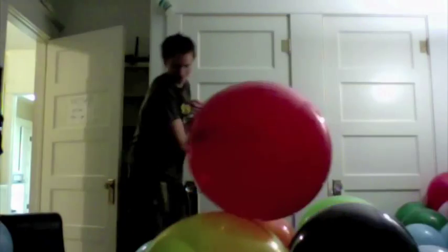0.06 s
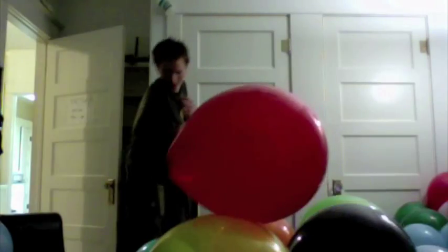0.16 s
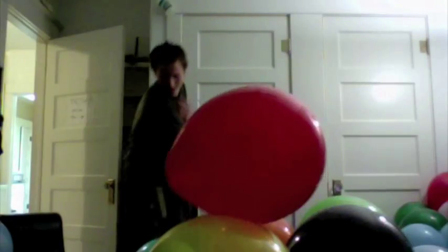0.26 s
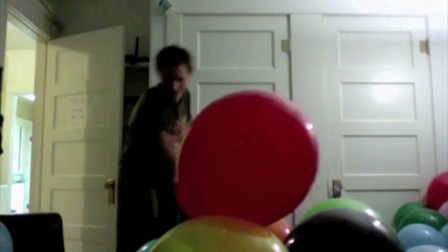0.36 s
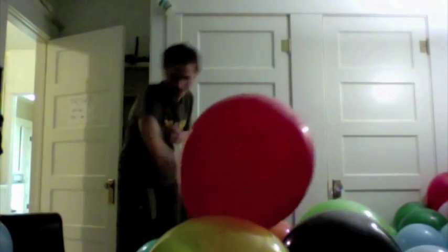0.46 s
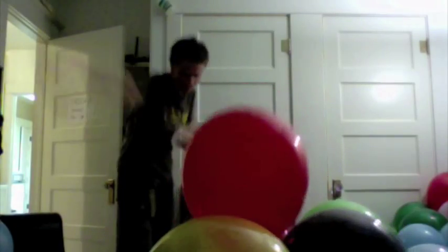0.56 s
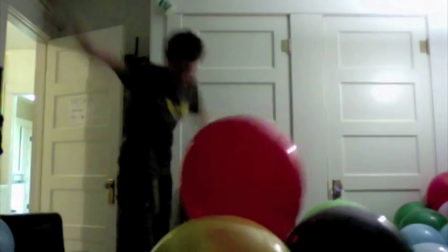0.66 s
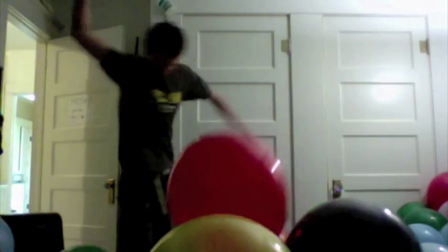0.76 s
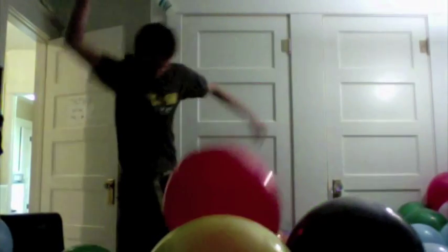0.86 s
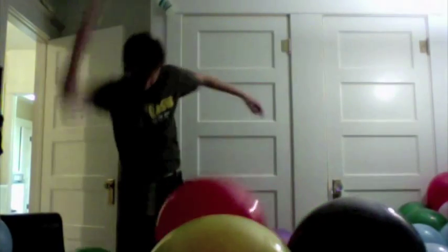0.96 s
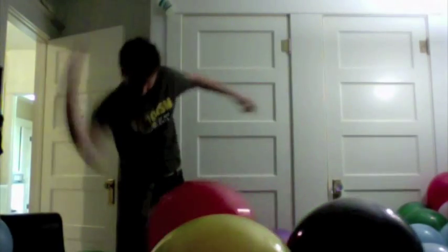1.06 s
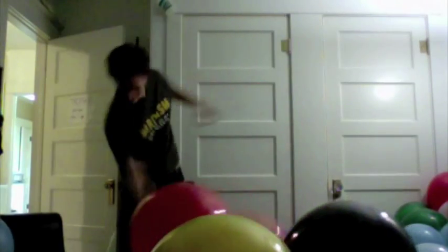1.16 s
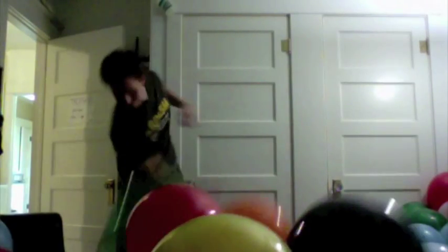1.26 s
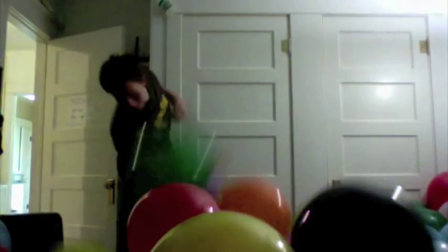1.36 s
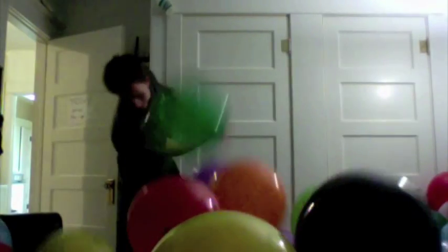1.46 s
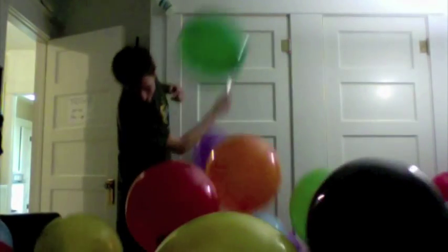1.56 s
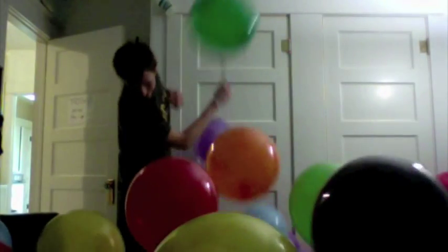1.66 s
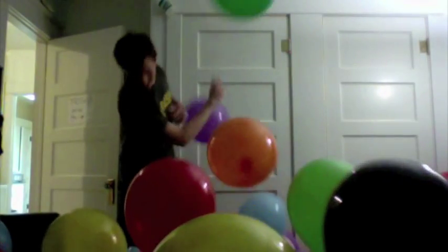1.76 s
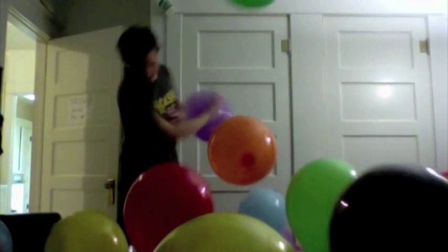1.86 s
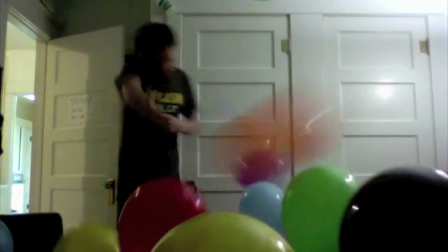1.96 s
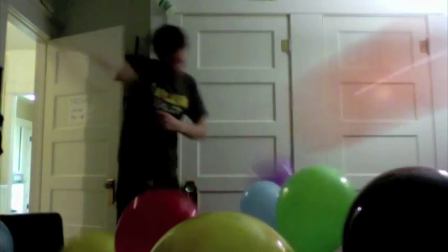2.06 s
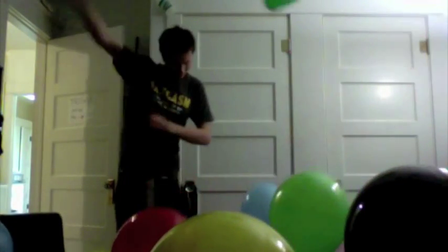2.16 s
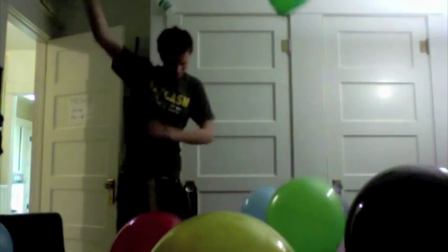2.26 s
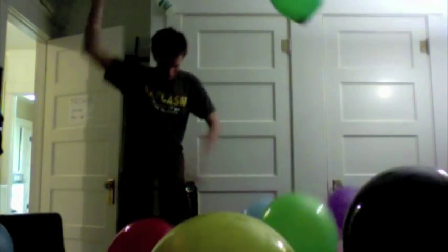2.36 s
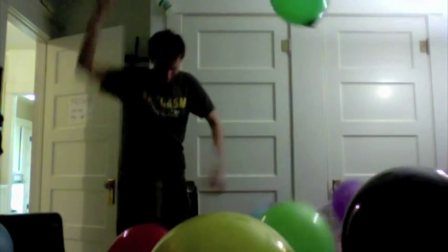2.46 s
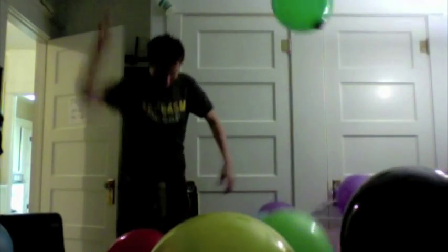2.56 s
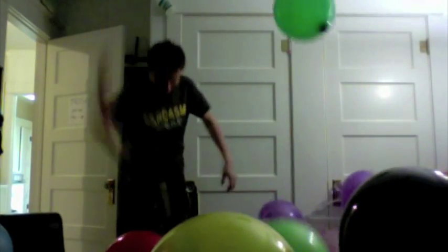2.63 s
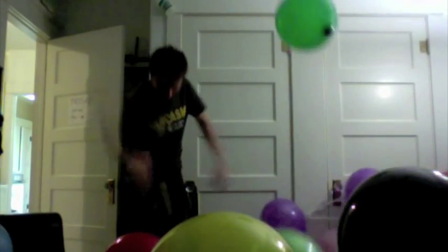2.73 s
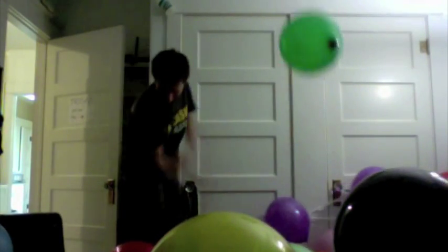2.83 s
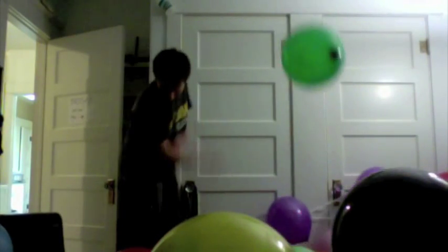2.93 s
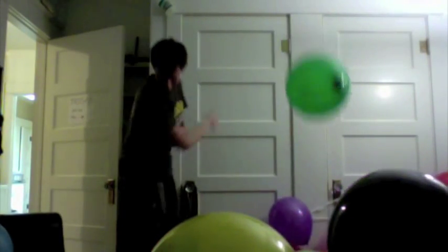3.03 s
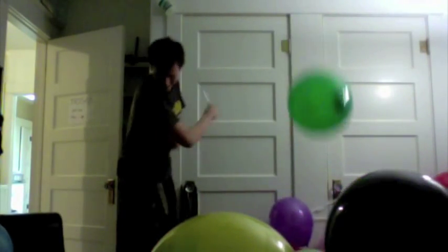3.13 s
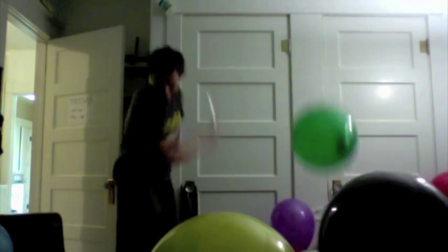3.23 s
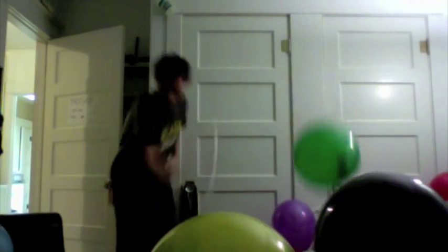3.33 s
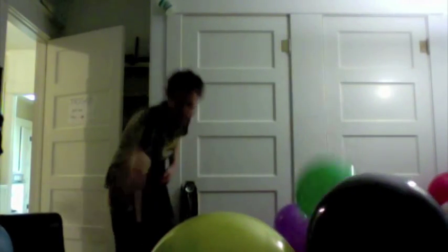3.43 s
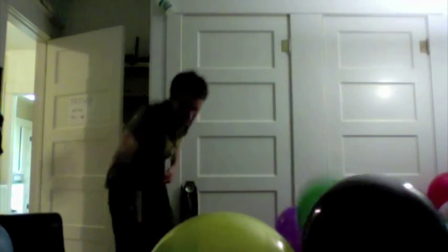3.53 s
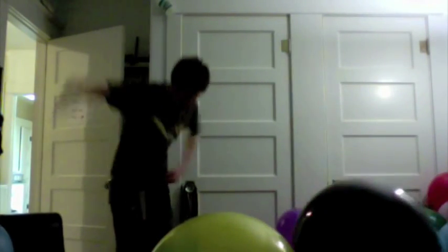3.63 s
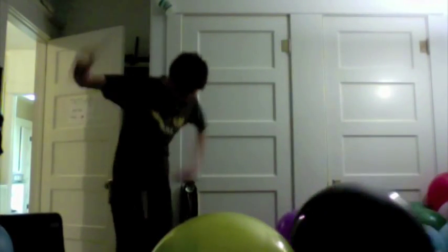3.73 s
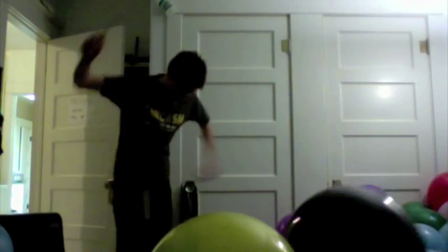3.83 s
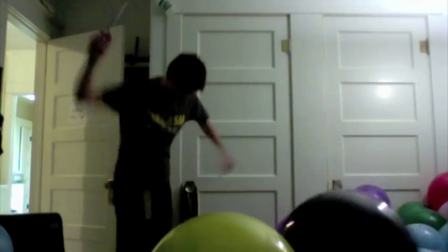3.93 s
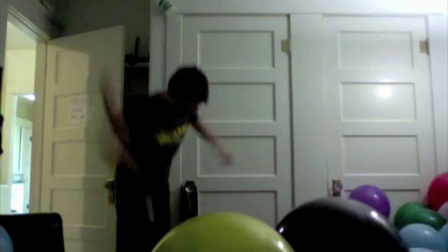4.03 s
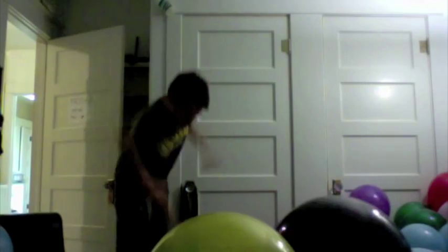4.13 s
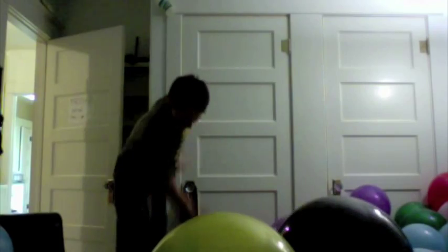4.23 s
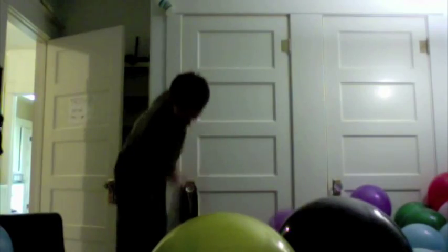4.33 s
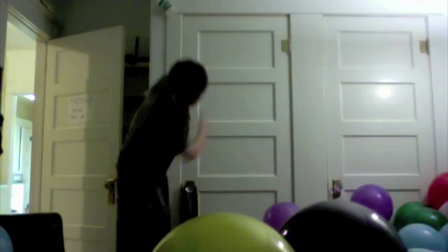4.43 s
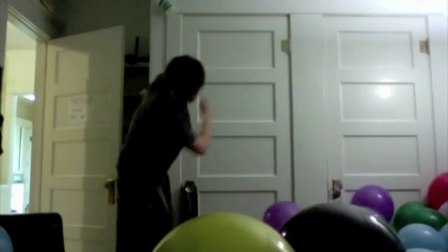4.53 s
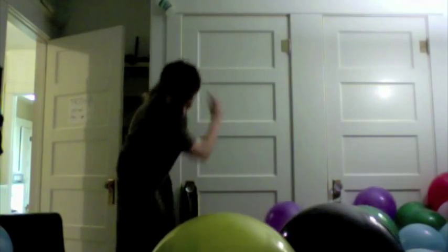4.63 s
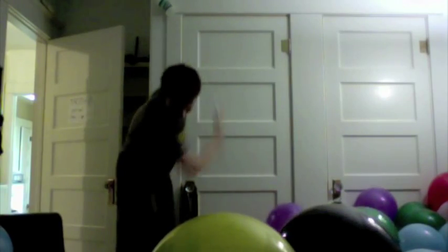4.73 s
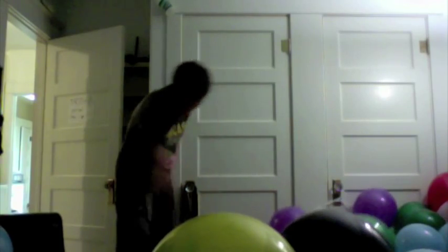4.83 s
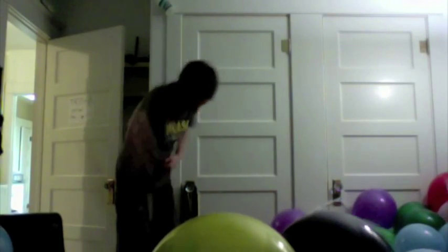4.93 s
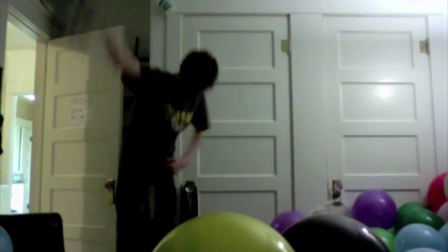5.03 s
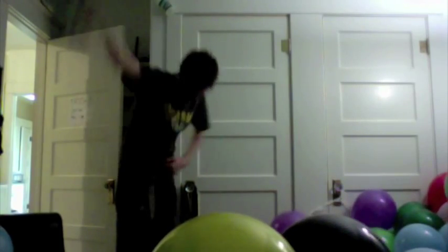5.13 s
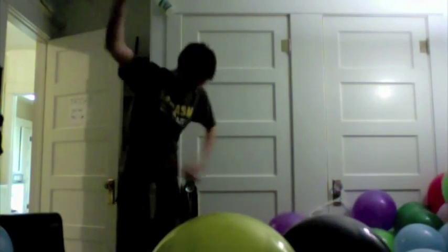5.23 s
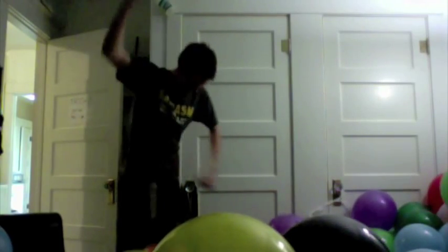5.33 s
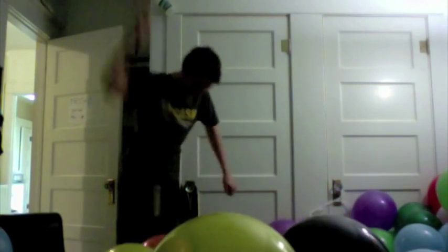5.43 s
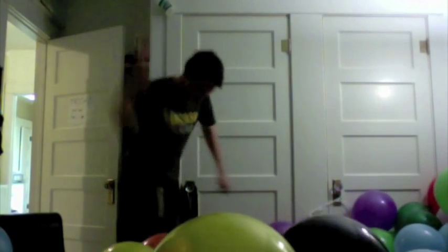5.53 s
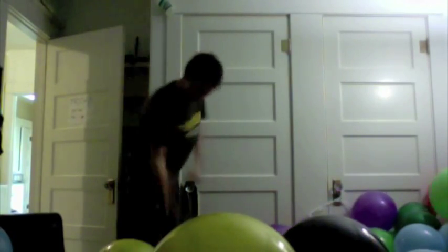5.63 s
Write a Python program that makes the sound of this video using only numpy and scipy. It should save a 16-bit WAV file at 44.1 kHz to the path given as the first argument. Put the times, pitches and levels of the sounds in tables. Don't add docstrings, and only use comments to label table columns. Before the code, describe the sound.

A small, hard-walled room full of latex balloons, heard through a small, thin-sounding microphone that overloads. It opens with faint hiss, a brief dip in level and tiny rubbery bumps. At about 0.5 s a bright, sharp burst cracks and splashes off the walls. Near 1.2 s comes a softer, booming slap with a floor thud, then hollow balloon bumps around 1.6 and 1.85 s, and a sharp but weaker slap at 1.95 s. Rubber squeaks and scuffs lead to a strong, low-bodied blast at 2.75 s. A quick, crisp burst follows at 3.4 s, then busy bumping, scuffing and creaking from 3.6 to 4.1 s. A loud, clipped burst hits at 4.2 s, a brief rubber creak at 4.5 s, a faint dull slap with a low thud at 4.87 s, a short bump at 5.1 s, and the biggest bang at 5.6 s, cut off while still ringing.

```python
import sys
import numpy as np
from scipy import signal
from scipy.io import wavfile
from scipy.ndimage import uniform_filter1d

SR = 44100
rng = np.random.default_rng(int(sys.argv[2]) if len(sys.argv) > 2 else 0)


def waveform_to_disk(signal):
    frames = np.transpose(np.atleast_2d(signal))
    scaled = np.clip(frames, -1, 1) * 32767
    samples = np.round(scaled).astype(np.int16)
    wavfile.write(sys.argv[1], SR, samples)


def voltage_ratio(level):
    return 10 ** (np.asarray(level, float) / 20)


N = 250752


def at_hz(points, hz):
    table = np.array(points)
    return np.interp(np.log(hz), np.log(table[:, 0]), table[:, 1])


def rms_one(x):
    return x / np.sqrt(np.mean(x ** 2) + 1e-20)


def highpass(x, order, cut_hz):
    return signal.sosfilt(signal.butter(order, cut_hz, "high", fs=SR, output="sos"), x)


def resonate(x, hz, width_hz):
    r = np.exp(-np.pi * width_hz / SR)
    zeros = np.array([1, 0, -1]) * (1 - r * r) / 2
    poles = [1, -2 * r * np.cos(2 * np.pi * hz / SR), r * r]
    return signal.lfilter(zeros, poles, x)


def swell(rise_ms, t60_s, size):
    t = np.arange(size) / SR
    return (1 - np.exp(-1000 * t / max(rise_ms, .2))) * voltage_ratio(-60 * t / t60_s)


def flutter(count, per_s, size):
    knots_s = np.arange(int(size / SR * per_s) + 2) / per_s
    t = np.arange(size) / SR
    return np.array([np.interp(t, knots_s, row) for row in rng.standard_normal((count, len(knots_s)))])


def add(out, s, x):
    i = max(round(s * SR), 0)
    out[i:i + len(x)] += x[:N - i]


EDGES_HZ = 44 * 2 ** np.arange(0, 8.7, 1 / 3)


def noise_bands():
    white = rng.standard_normal((2, N))
    bands = []
    for k, edges in enumerate(zip(EDGES_HZ, EDGES_HZ[1:])):
        sos = signal.butter(2, edges, "band", fs=SR, output="sos")
        bands.append(signal.sosfilt(sos, white[k % 2]))
    return np.sqrt(EDGES_HZ[1:] * EDGES_HZ[:-1]), np.array(bands)


# (time [s], level [dB rms])
AIR = [(0, -64), (.15, -65.5), (.3, -70.5), (.9, -67), (1.75, -69), (2.4, -66), (2.599, -64), (3.2, -63.5),
       (3.4, -70.5), (4.05, -60), (4.6, -63), (4.8, -67), (5.15, -60), (5.3, -68), (5.69, -78)]
# (frequency [Hz], level [dB per Hz])
AIR_COLOUR = [(50, -11.5), (90, -5.5), (140, 0), (300, -6.5), (480, -2), (800, -11.5), (1200, -14),
              (3500, -12.5), (7000, -22.5), (11000, -26), (16000, -43.5)]
HISS_DB, HISS_FOLLOWS, AIR_MEAN_DB = -69, 0.43, -63.5


def air(centres_hz, bands, patchy_db):
    stir_db = np.interp(np.arange(N) / SR, *np.transpose(AIR))
    hiss_db = HISS_DB + HISS_FOLLOWS * (stir_db - AIR_MEAN_DB)
    colour = voltage_ratio(at_hz(AIR_COLOUR, centres_hz))[:, None]
    flicker = voltage_ratio(patchy_db * flutter(len(centres_hz), 11, size=N))
    patches = colour * bands[:, ::-1] * flicker
    low = centres_hz < 1100
    shuffle = rms_one(patches[low].sum(axis=0))
    hiss = rms_one(patches[~low].sum(axis=0))
    return voltage_ratio(stir_db) * shuffle + voltage_ratio(hiss_db) * hiss


# (time [s], level [dB rms], centre [Hz], t60 [s])
BUMPS = [(.002, -52, 440, 0.15), (.12, -64, 600, 0.45), (.288, -62.5, 750, 0.32), (.33, -61, 680, .16),
         (1.581, -57, 600, 0.11), (1.6, -49.5, 380, 0.2), (1.83, -50.5, 600, 0.61),
         (1.853, -33.5, 460, 0.13), (1.873, -42, 218, .28), (2.588, -50, 200, .6), (2.67, -47, 250, 0.27),
         (3.192, -63, 300, 0.14), (3.7, -35.5, 680, .24), (3.855, -40, 587, 0.15), (3.97, -46, 197, .3),
         (3.987, -51, 298, .067), (4.045, -45.5, 599, .1), (5.087, -37, 748, 0.076),
         (5.115, -51, 800, 0.077)]
# (time [s], level [dB rms], centre [Hz], t60 [s])
SCUFFS = [(1.099, -49, 646, .1), (1.275, -49.5, 9900, .4), (1.601, -60, 2484, .14),
          (1.682, -61, 5000, .071), (1.865, -46.5, 1800, 0.16), (2.219, -66, 2470, 0.26),
          (2.43, -65.5, 2770, 0.44), (2.638, -43.5, 1770, 0.25), (2.665, -47, 1892, 0.35),
          (3.7, -34.5, 1980, 0.17), (3.771, -46, 1019, 0.084), (3.836, -51, 8000, 0.095),
          (3.775, -52.5, 3800, .08), (3.882, -49.5, 1198, 0.087), (3.884, -56.5, 3010, 0.092),
          (4.02, -58.5, 3200, 0.1), (4.086, -49, 1375, 0.13), (4.095, -58, 3520, .1),
          (4.14, -55, 1492, 0.09), (5.088, -50, 1685, 0.1)]
# (time [s], level [dB rms], centre [Hz], t60 [s])
CREAKS = [(.17, -67, 1900, 0.27), (.13, -63, 600, .4), (.25, -63, 800, .35), (3.03, -55, 1534, 0.61),
          (3.165, -50.5, 1554, 0.13), (3.64, -41, 1652, .25), (3.7, -45.5, 3220, .25),
          (3.748, -50, 3230, 0.24), (3.77, -50.5, 1640, .2), (3.854, -41, 960, 0.099),
          (4.018, -50.5, 1650, 0.17), (4.488, -45.5, 1600, 0.17)]
# (time [s], level [dB rms], centre [Hz])
TICKS = [
    (.11, -68, 9000),
    (0.134, -60.5, 6300),
    (.143, -66, 9500),
    (.288, -67, 8600),
    (1.88, -54, 6400),
    (2.403, -69, 7560),
    (3.703, -45, 6900),
    (4.003, -57, 7220),
    (5.093, -55.5, 8360),
    (5.565, -62, 4280),
]
TICK_T60_S = 0.075
# (width [share of pitch], rise [ms])
BUMP, SCUFF, CREAK, TICK = (1, 4.9), (0.75, 5.4), (0.15, 3.2), (0.33, 2.8)


def stirring(grain_db):
    out, size = np.zeros(N), SR // 2
    ticks = [(*row, TICK_T60_S) for row in TICKS]
    for rows, (share, rise_ms) in [(BUMPS, BUMP), (SCUFFS, SCUFF), (CREAKS, CREAK), (ticks, TICK)]:
        for s, level_db, hz, t60_s in rows:
            grains = rng.standard_normal(size) * voltage_ratio(grain_db * flutter(1, 150, size=size)[0])
            narrow = resonate(grains, hz, 0.31 * share * hz)
            puff = resonate(narrow, hz, 3.4 * share * hz)
            add(out, s, voltage_ratio(level_db) * rms_one(puff) * swell(rise_ms, t60_s, size=size))
    return out


# (time [s], level [dB peak], frequency [Hz], t60 [s])
RINGS = [
    (.185, -48, 540, 0.095),
    (1.095, -35.5, 470, 0.1),
    (1.137, -44, 470, 0.092),
    (1.599, -36.5, 458, 0.11),
    (1.825, -36.5, 490, 0.043),
]
# (time [s], level [dB peak], frequency
# [Hz], t60 [s])
STEPS = [(.33, -58, 162, .21), (.996, -59, 149, .2), (1.09, -54, 114.4, 0.34), (1.172, -16.5, 136, .3),
         (1.592, -34, 120, 0.18), (1.625, -30.5, 121, 0.22), (1.85, -38.5, 114, 0.26),
         (2.25, -51.5, 114.3, 0.28), (2.4, -48, 109.5, 0.29), (2.592, -38, 116, 0.51),
         (3.699, -46, 122.2, .19), (3.972, -44.5, 120, .25), (4.872, -23, 125.2, 0.32),
         (5.04, -50, 120.3, .2), (5.26, -52.5, 150.3, 0.15)]
RING_RISE_MS, STEP_RISE_MS = 2, 12


def rings():
    out, size = np.zeros(N), SR // 2
    for rows, rise_ms in [(RINGS, RING_RISE_MS), (STEPS, STEP_RISE_MS)]:
        for s, peak_db, hz, t60_s in rows:
            waver = 1 + 0.12 * flutter(1, 30, size=size)[0]
            lumps_db = 3.3 * flutter(1, 40, size=size)[0]
            tone = np.sin(2 * np.pi * hz * np.cumsum(waver) / SR)
            add(out, s, voltage_ratio(peak_db + lumps_db) * tone * swell(rise_ms, t60_s, size=size))
    return out


# (time [s], level [dB peak], dullness cut [Hz], negative = push, following stir [dB])
FIRST = [
    (0.48, -16, 1500, -20),
    (1.1689, -14, -1100, -24.5),
    (1.9558, -8.5, 5000, -29),
    (2.746, -21.5, -1800, -26.5),
    (3.4208, -14.5, 1545.5, -24.5),
    (4.1716, -13.5, -1800, -19.5),
    (4.8643, -29, 700, -37.5),
    (5.618, -13, -700, -15.5),
]


def first_arrivals():
    size = 1323
    out, t = np.zeros(N), np.arange(size) / SR
    for s, peak_db, cut_hz, stir_db in FIRST:
        u = 2 * np.pi * abs(cut_hz) * t
        add(out, s, -np.sign(cut_hz) * voltage_ratio(peak_db) * (u * np.exp(1 - u)) ** 2)
        white = rng.standard_normal(size)
        dull = rms_one(resonate(resonate(white, 420, 400), 550, 900))
        stir = dull + voltage_ratio(-6.0) * resonate(white, 2500, 4000)
        add(out, s, voltage_ratio(stir_db) * stir * swell(0.86, .3, size=size))
    return out


# (time [s], wash [dB rms], build-up [ms], blast [dB], blast frequency [Hz])
WASH = [
    (0.4854, 3.5, 2.8, -3.5, 2164),
    (1.1694, -11.5, 18, -58, 430),
    (1.9547, -19, 4.9, -54, 426),
    (2.7523, 1.5, 3.8, 5.5, 401),
    (3.4230, 3, 1.4, 2.5, 641),
    (4.1802, 7.5, 11, 3, 1444),
    (4.867, -20, 16.7, -36, 450),
    (5.624, 10, 11.3, 3.5, 596.8),
]
# (boom [dB], snap [dB], dulling [dB], decay stretch [ratio])
SKIN = [
    (-0.5, 4.5, -3, .97),
    (11, 1.9, -4.5, 0.84),
    (7.5, 1, -11.5, 0.8),
    (1.3, 3.5, -3, 0.9),
    (-2, 1.3, -7, 0.87),
    (-0.2, 3.5, -2.5, 0.94),
    (12.5, 5, -8, 0.6),
    (2.5, 4.5, -2.5, .92),
]
# (frequency [Hz], share [ratio])
BOOM = [(100, 1.2), (200, 0.95), (550, 0.045), (1250, 0.011)]
# (frequency [Hz], share [ratio])
SNAP = [(1250, -0.4), (2300, 1.0), (4500, .01)]
# (frequency [Hz], share [ratio])
DULLING = [(550, .01), (1250, 0.44), (4500, 0.74), (10000, 1.0)]
# (frequency [Hz], level [dB per Hz])
ROOM = [(50, -16), (110, -7.5), (240, -11), (330, -7.5), (460, -3.5), (620, -4.5), (1000, -10.5),
        (2200, -10.5), (4000, -12), (9000, -18), (16000, -28)]
# (frequency [Hz], t60 [s])
ROOM_T60 = [(80, 0.41), (300, 0.41), (1000, 0.45), (2500, 0.41), (5000, 0.44), (9000, 0.47), (14000, 0.46),
            (17000, 0.5)]
# (frequency [Hz], width [Hz], level [dB])
ROOM_MODES = [(224, 30, -4), (277, 24, -1.5), (359, 60, -1), (439, 14, -3.5), (458, 25, -3), (568.4, 8, -4),
              (672, 16, -9)]
# (frequency [Hz], share of build-up time [ratio])
BUILD_UP = [(300, 0.89), (1500, 0.35), (6000, 1.4)]
# (frequency [Hz], added slope [1/s])
STEEPEN = [(2000, 0.36), (6000, 0.63), (12000, 2.6)]
ECHO_FADE_DB_PER_MS = .2


def wash(centres_hz, bands, echo_db, modes_db, patchy_db):
    out, size = np.zeros(N), SR // 2
    colour = voltage_ratio(at_hz(ROOM, centres_hz))
    colour = colour / np.sqrt(np.mean((colour @ bands) ** 2))
    t60_s = at_hz(ROOM_T60, centres_hz)[:, None]
    share = at_hz(BUILD_UP, centres_hz)[:, None]
    steepen = np.clip(at_hz(STEEPEN, centres_hz), 0, 5)[:, None]
    reach = np.array([at_hz(table, centres_hz) for table in (BOOM, SNAP, DULLING)])
    for (s, level_db, rise_ms, blast_db, blast_hz), (*skin_db, stretch) in zip(WASH, SKIN):
        i = round(s * SR)
        t = np.arange(min(size, N - i)) / SR
        fall_db = -60 * t * (1 + t * steepen) / (stretch * t60_s)
        fall_db = fall_db + patchy_db * flutter(len(centres_hz), 25, size=len(t))
        shape = (1 - np.exp(-1000 * t / (rise_ms * share))) * voltage_ratio(fall_db)
        field = (colour * voltage_ratio(skin_db @ reach)) @ (bands[:, i:i + size] * shape)
        delays_s = rng.uniform(0.0019, 0.056, 14)
        heights = rng.uniform(-1, 1, size=14) * voltage_ratio(skin_db[2] / 2)
        for delay_s, height in zip(delays_s, heights):
            gain = voltage_ratio(echo_db - ECHO_FADE_DB_PER_MS * 1000 * delay_s)
            field[round(delay_s * SR):][:5] += gain * height * np.array([0.89, 1.0, 0.98, .55, .1])
        blast = -np.sin(2 * np.pi * blast_hz * t) * voltage_ratio(blast_db - 60 * t / 0.052)
        add(out, s, voltage_ratio(level_db) * field + blast)
    modes = sum(voltage_ratio(db) * resonate(out, hz, width_hz) for hz, width_hz, db in ROOM_MODES)
    return out + voltage_ratio(modes_db) * modes


# (time [s], level [dB rms], slip rate [Hz], t60 [s])
SQUEAKS = [
    (2.472, -49, 2557, .29),
    (2.637, -45, 4920, .18),
]
# (frequency [Hz], level [dB])
RUB_COLOUR = [(2550, -3), (5100, -2), (7650, 2.5), (10200, 1), (12750, -4.5), (15300, -5.5)]
SLIP_BLUR = 0.38


def squeak():
    out, size = np.zeros(N), SR // 2
    for s, level_db, slip_hz, t60_s in SQUEAKS:
        white = rng.standard_normal(size)
        rub = np.zeros(size)
        for hz in np.arange(slip_hz, 16500, slip_hz):
            rub += voltage_ratio(at_hz(RUB_COLOUR, hz)) * resonate(white, hz, SLIP_BLUR * slip_hz)
        add(out, s, voltage_ratio(level_db) * rms_one(rub) * swell(13.0, t60_s, size=size))
    return out


def scene():
    centres_hz, bands = noise_bands()
    bursts = first_arrivals() + wash(centres_hz, bands, echo_db=1.0, modes_db=1.0, patchy_db=2.0)
    contacts = stirring(grain_db=3.0) + rings() + squeak()
    return (bursts + contacts + air(centres_hz, bands, patchy_db=2.5))[None]


GATE_HZ, GATE_DB, GATE_SLOPE, GATE_DEPTH_DB = 8000, -49, .8, 7


def gate(x):
    high = highpass(x, 2, GATE_HZ)
    level_db = 10 * np.log10(uniform_filter1d(high ** 2, size=882) + 1e-14)
    gain_db = np.clip(GATE_SLOPE * (level_db - GATE_DB), -GATE_DEPTH_DB, 0)
    return x - high * (1 - voltage_ratio(gain_db))


def top_cut(x):
    return signal.sosfilt(signal.butter(12, 18000, fs=SR, output="sos"), x)


# (time [s], level [dB])
FADE = [(0, 3), (0.022, -9), (.042, -28), (.06, -12), (.11, 0.5), (6, 0)]
OVERLOAD, BASS_CUT_HZ, COUPLING_HZ = .39, 120, 100


def record(dry):
    x = np.clip(dry, -OVERLOAD, OVERLOAD)
    x = highpass(x, 6, BASS_CUT_HZ)
    x = highpass(x, 1, COUPLING_HZ)
    x = np.clip(gate(x), -.92, .92)
    for stop_db, stop_hz in [(26, 15950), (30, 16850)]:
        x = signal.sosfilt(signal.cheby2(12, stop_db, stop_hz, fs=SR, output="sos"), x)
    x = x * voltage_ratio(np.interp(np.arange(N) / SR, *np.transpose(FADE)))
    return top_cut(np.clip(x, -1, 1))


dry = scene()
out = record(dry)
waveform_to_disk(out)
```